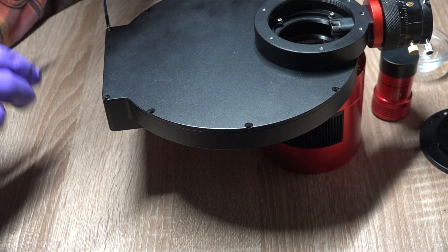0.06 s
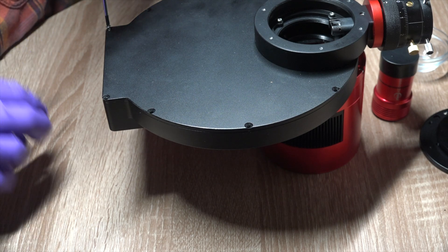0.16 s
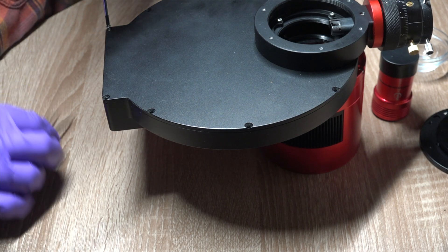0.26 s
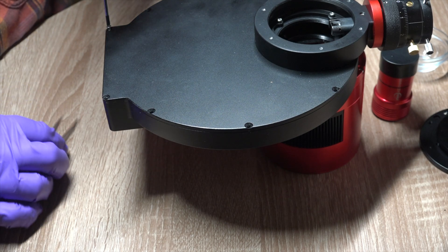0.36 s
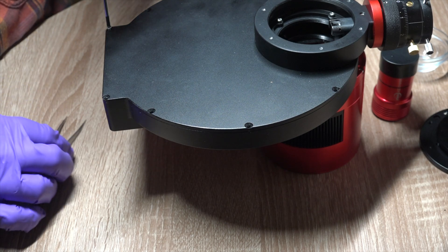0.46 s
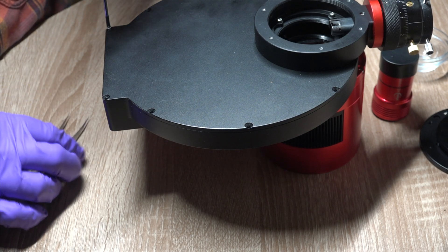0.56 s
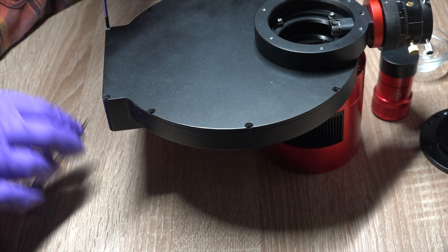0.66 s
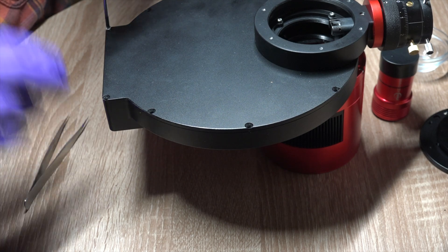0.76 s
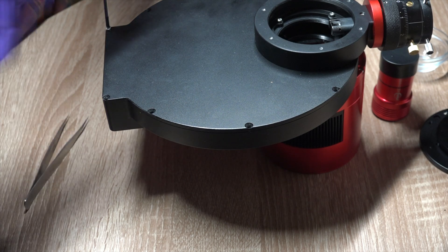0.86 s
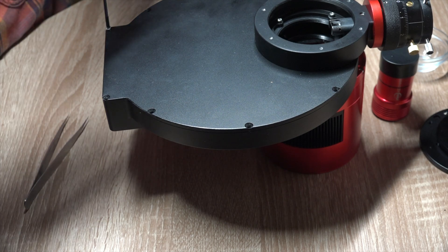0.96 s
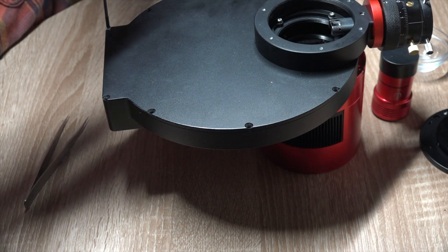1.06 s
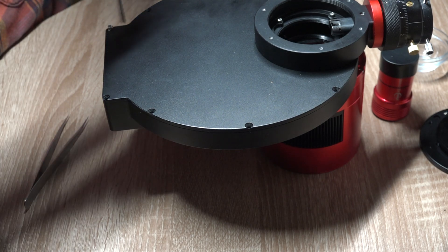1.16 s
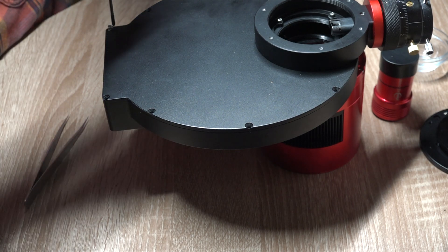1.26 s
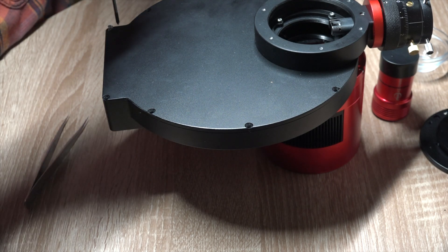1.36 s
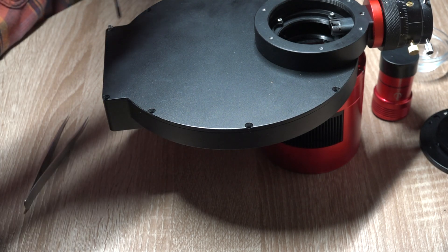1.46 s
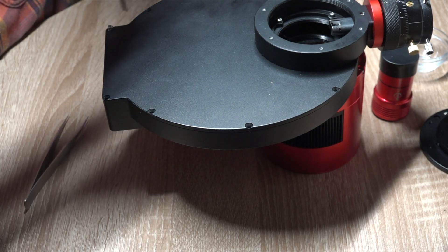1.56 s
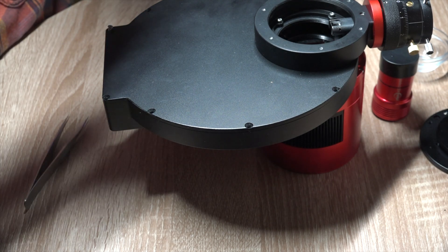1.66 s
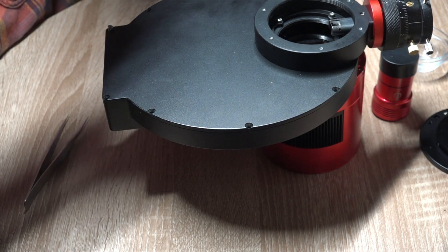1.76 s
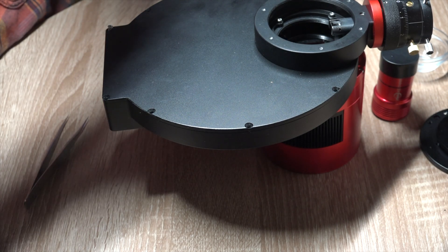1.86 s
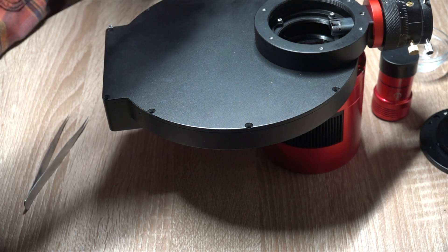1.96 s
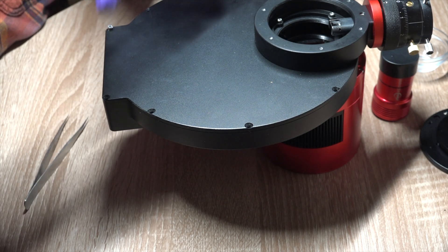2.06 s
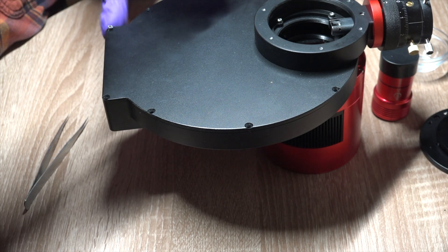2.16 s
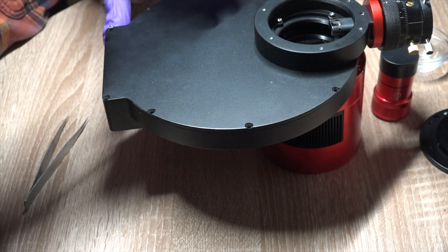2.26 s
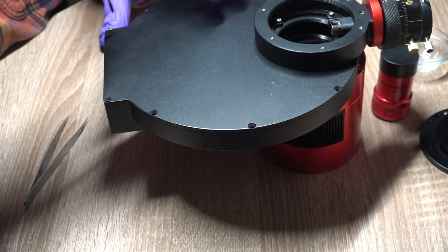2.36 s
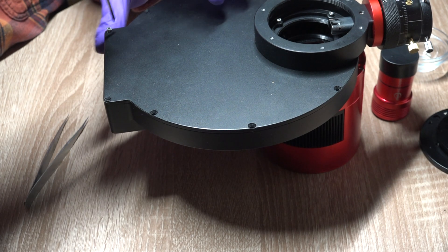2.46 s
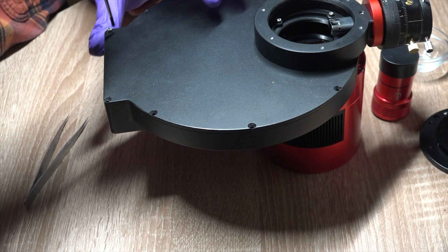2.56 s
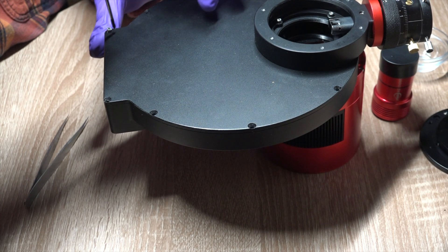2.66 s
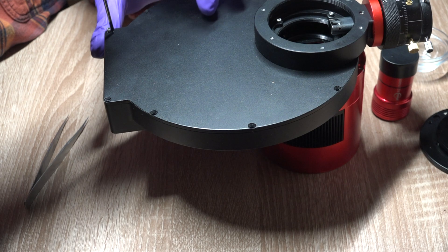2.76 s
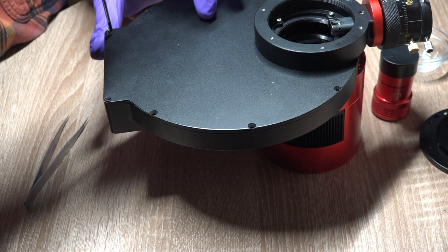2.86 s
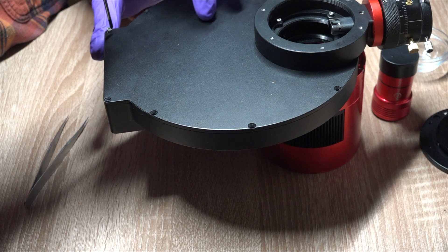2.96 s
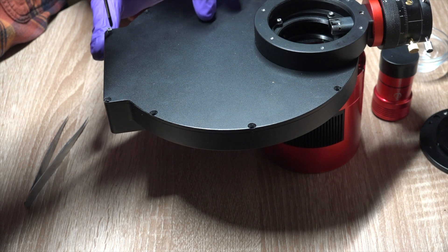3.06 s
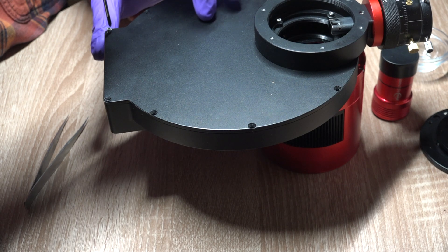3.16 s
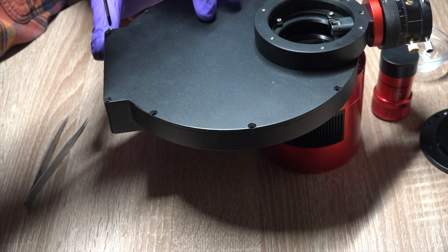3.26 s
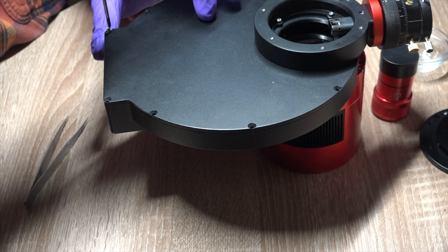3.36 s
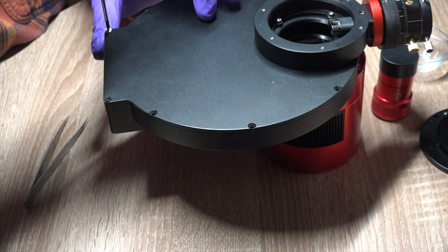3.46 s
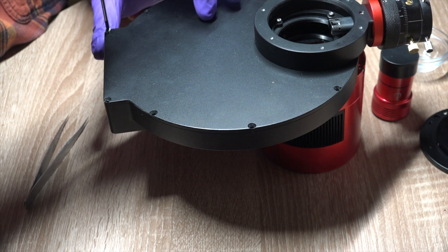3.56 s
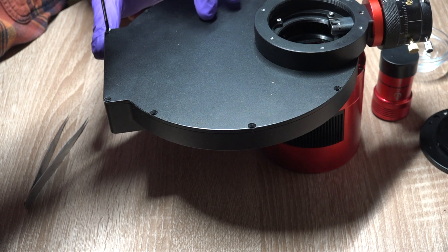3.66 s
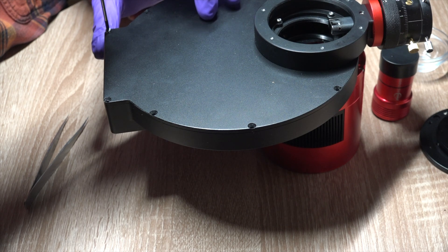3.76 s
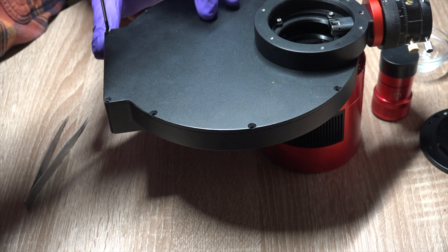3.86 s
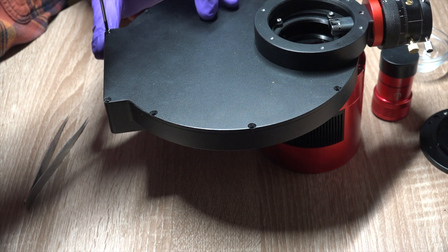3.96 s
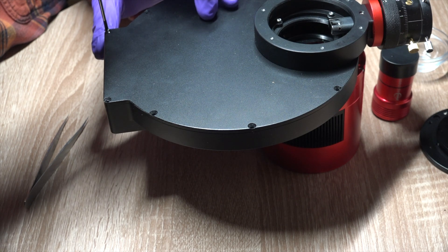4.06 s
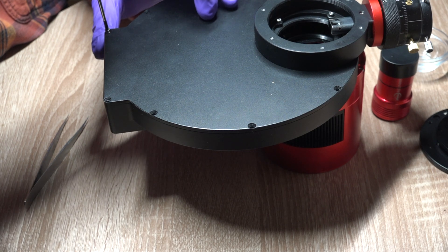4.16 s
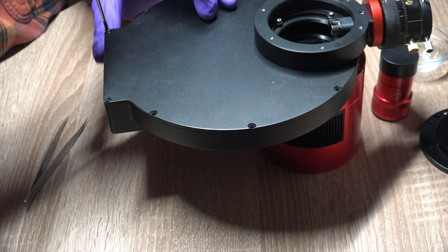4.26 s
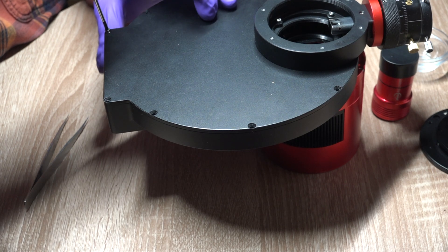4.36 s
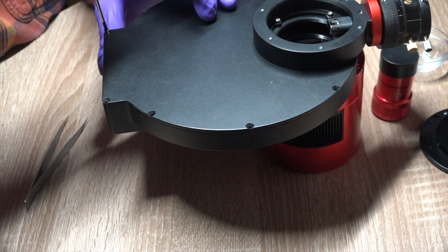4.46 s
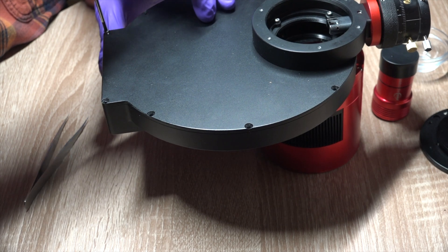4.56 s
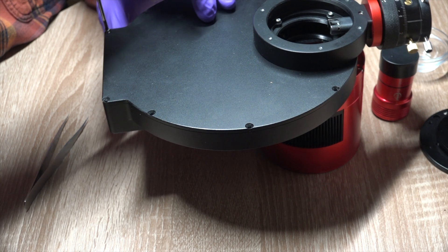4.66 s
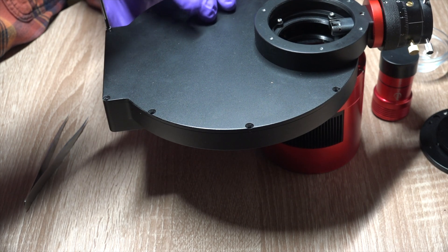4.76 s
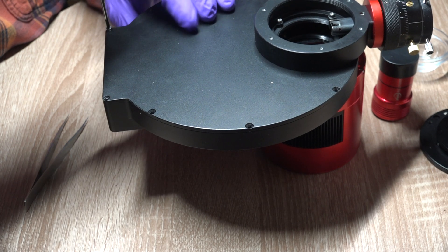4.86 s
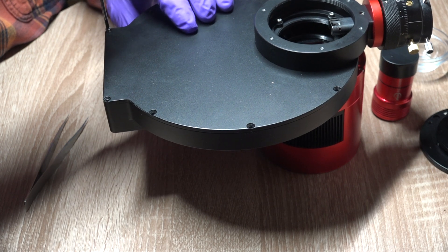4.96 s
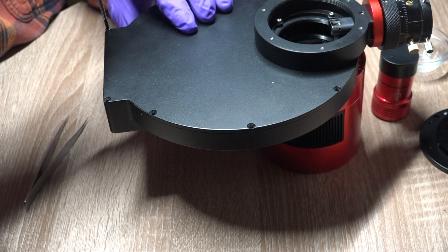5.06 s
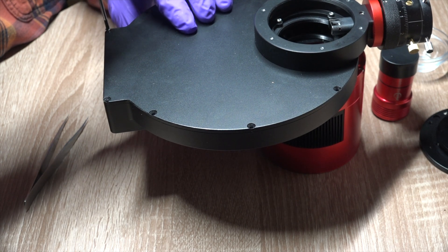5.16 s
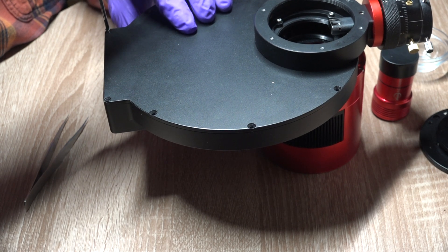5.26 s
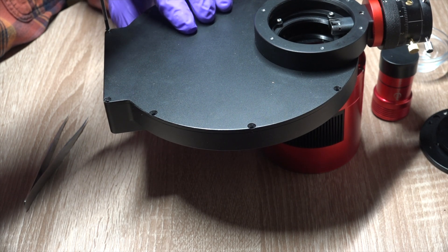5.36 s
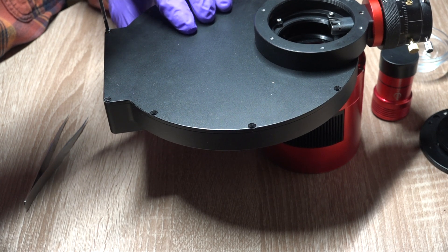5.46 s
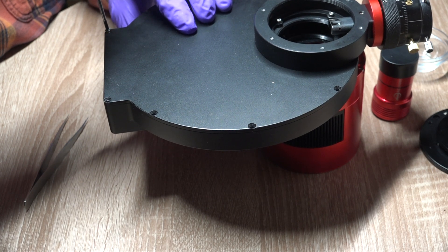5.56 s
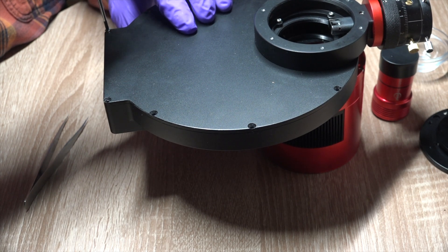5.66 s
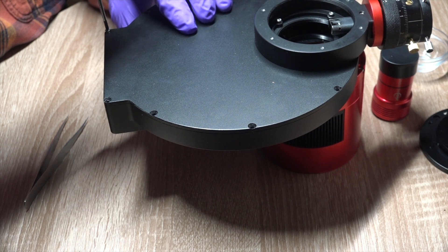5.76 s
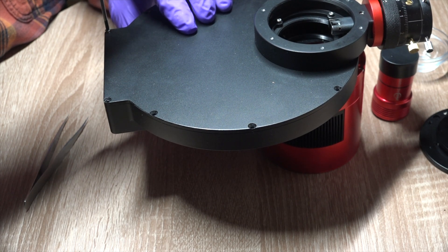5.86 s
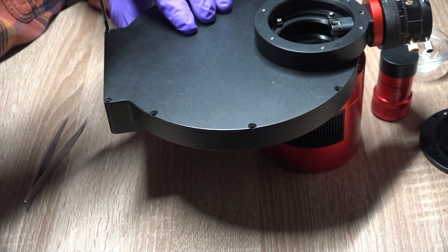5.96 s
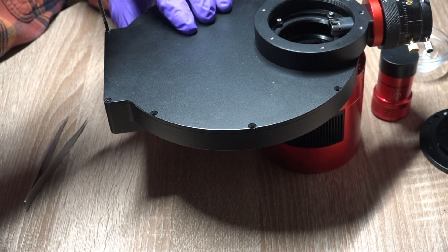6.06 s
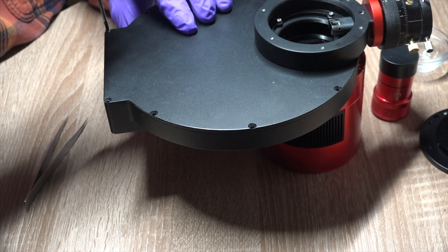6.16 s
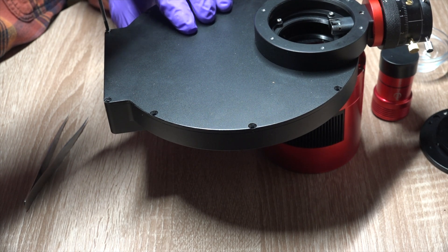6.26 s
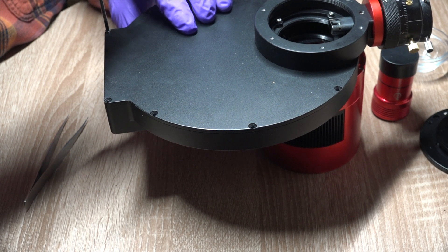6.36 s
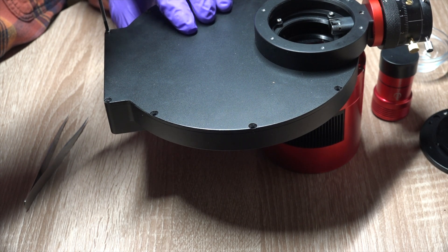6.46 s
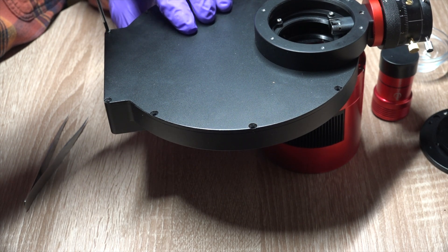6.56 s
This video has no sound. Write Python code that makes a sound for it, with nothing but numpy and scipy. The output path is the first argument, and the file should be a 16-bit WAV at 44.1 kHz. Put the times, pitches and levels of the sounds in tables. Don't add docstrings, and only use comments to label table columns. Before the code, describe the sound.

A small quiet room, close microphone, with faint low mains hum, soft hiss and barely audible rapid camera lens ticking. Rubber gloves rustle lightly throughout. At 0.3 s tweezers touch wood softly; at 0.44 they slap down with a bright steel ring, then scrape grittily along the grain from 0.52 to 0.7, bumping and fading. Around 1.07-1.14 a tick and clinks as a hex key is lifted, then sharp metallic strikes at 1.24-1.31. Sparse tiny ticks follow, clearest near 2.15, and a clear mid-pitched knock on a metal housing at 2.77. A near-quiet stretch holds faint dull fumbling at 3.5 and 4.1, with a small tick at 4.4. A low thump lands at 4.74, a burst of tight screw creaks at 4.96, thumps at 5.28 and 5.76, a short creak at 5.57, then faint squeaks and a loud snapping creak at 6.47, dying away by 6.6.

```python
import sys
import numpy as np
from scipy import signal
from scipy.fft import rfft, irfft, next_fast_len
from scipy.io import wavfile
from scipy.ndimage import uniform_filter1d

SR = 44100
rng = np.random.default_rng(int(sys.argv[2]) if len(sys.argv) > 2 else 0)


def to_wav(sig):
    pcm = np.clip(np.atleast_2d(sig), -1, 1) * 32767
    pcm = np.round(pcm).astype(np.int16)
    wavfile.write(sys.argv[1], SR, pcm.T)


def to_linear_factor(level_db):
    exponent = np.asarray(level_db, float) / 20
    return 10 ** exponent


N = 291942
T = np.arange(N) / SR

# f/Hz, width/Hz, level/dB
KEY_SEATED = [(662, 80, -10), (1050, 26, -8), (1270, 55, -7), (1710, 44, -6), (1950, 32, -11),
              (2610, 42, -1), (3100, 30, -7), (3500, 80, -12), (3800, 33, -8), (4010, 40, -9),
              (4670, 40, -10), (6210, 30, -11), (7300, 50, -12), (7850, 40, -14)]
SOCKET = [(180, 75, -9), (420, 40, -7), (581, 50, -1), (1270, 110, -7), (1730, 110, -4), (2620, 90, -7),
          (3150, 60, -9), (4000, 90, -10), (4600, 90, -9), (7300, 150, -20)]
# f/Hz, level/dB per Hz
METAL_CLICK = [(300, -29), (600, -10.5), (2600, -11.5), (3800, -6.5), (6800, -10.5), (8300, -7.5),
               (10500, -22), (15500, -28)]
WOOD = [(120, -37), (300, -14.5), (600, -6), (2000, 2.5), (3200, 0), (5200, -8.5), (7000, -30), (8500, -31),
        (11000, -40), (15500, -42)]


def level(x, db):
    return x * to_linear_factor(db) / np.sqrt(np.mean(x ** 2))


def curve(table, column):
    rows = np.array(table)
    return to_linear_factor(np.interp(T, rows[:, 0], rows[:, column], left=-200, right=-200))


def colour(x, points):
    hz, db = np.transpose(points)
    bins = np.fft.rfftfreq(4096, 1 / SR)
    cep = irfft(np.log(to_linear_factor(np.interp(np.log(bins + 1), np.log(hz), db))))
    cep[1:2048] *= 2
    cep[2049:] = 0
    impulse = irfft(np.exp(rfft(cep)))
    return signal.fftconvolve(x, impulse)[:len(x)]


def band(x, hz, width):
    return signal.lfilter(*signal.iirpeak(hz, hz / width, SR), x)


def walk(rate):
    k = int(SR / rate)
    held = np.repeat(rng.standard_normal(N // k + 1), k)
    return 1.3 * uniform_filter1d(uniform_filter1d(held, k), k)[:N]


def grit(count, rate_hz, spread_db):
    hit = rng.random(count) < rate_hz / SR
    sign = rng.standard_normal(count)
    size = rng.exponential(size=count)
    return hit * sign * to_linear_factor(spread_db * size)


def swell(s, db, rise_s, fade_s):
    out = np.zeros(N)
    near = slice(int(max(s - .2, 0) * SR), int((s + .7) * SR))
    t = T[near] - s
    out[near] = to_linear_factor(db) * np.exp(np.where(t < 0, -(t / rise_s) ** 2, -t / fade_s))
    return out


def knock(events, modes, crack, crack_db, tail_ms, rate_hz, low_hz, high_hz, soft, tilt_db):
    out, t = np.zeros(N + SR), T[:SR // 6]
    hz, width, db = np.repeat(np.array(modes, float), 3, axis=0).T
    spread = 0.7 * (np.arange(len(hz)) % 3 - 1)
    hz = hz + width * (spread + 0.12 * rng.standard_normal(len(hz)))
    onset = (1 - np.exp(-1600 * t))[:, None]
    rings = np.sin(2 * np.pi * np.outer(t, hz)) * np.exp(-4 * np.outer(t, width)) * onset
    for s, peak_db, chatter_ms, best_hz, *purer in events:
        rise_ms, fall_db = soft * chatter_ms, (purer or [tilt_db])[0]
        rise = (1 - np.exp(-1500 * t / max(rise_ms, .05))) ** 2
        push = rise * np.exp(-1000 * t / max(chatter_ms, .1))
        push = push * (grit(len(t), rate_hz, spread_db=2.0) + 0.18 * rng.standard_normal(len(t)))
        tail = rise * np.exp(-1000 * t / tail_ms) * rng.standard_normal(len(t))
        rattle = push / abs(push).max() + 0.11 * tail
        spectrum = np.sqrt(uniform_filter1d(abs(rfft(push)) ** 2, size=15))
        share = spectrum[(hz * len(t) / SR).astype(int)]
        gain = to_linear_factor(db - fall_db * abs(np.log2(hz / best_hz))) * np.sqrt(width)
        gain = gain * np.sign(rng.standard_normal(len(hz)))
        body = signal.fftconvolve(push, rings @ (gain / share))[:len(t)]
        dry_crack = colour(rattle, [(f, d - fall_db * abs(np.log2(f / best_hz))) for f, d in crack])
        sound = body / abs(body).max() + to_linear_factor(crack_db + tilt_db - fall_db) * dry_crack / abs(dry_crack).max()
        start = int(s * SR)
        out[start:start + len(t)] += to_linear_factor(peak_db) * sound
    return signal.sosfilt(signal.butter(3, [low_hz, high_hz], "band", fs=SR, output="sos"), out[:N])


def tweezers():
    # t/s, level/dB, chatter/ms, strongest f/Hz
    touches = [
        (0.3145, -31.5, 4, 600),
        (0.329, -38, 6, 400),
    ]
    hits = [
        (0.4375, -9.5, 3.4, 2800),
        (0.45, -25, 3.1, 3100),
        (0.480, -27, 2.6, 3100),
    ]
    # f/Hz, width/Hz, level/dB
    heel = [(378, 30, -4), (560, 60, -12), (850, 60, -10), (1600, 130, -17), (2600, 70, -18),
            (3400, 40, -17), (4450, 70, -14), (8100, 60, -22)]
    arms = [(350, 40, -13), (598, 32, -9), (1060, 38, 0), (1350, 40, -7), (1650, 40, -4), (1780, 50, -5),
            (2670, 48, -7), (3160, 60, 0), (3900, 80, -6), (4690, 40, -10), (5530, 45, -15),
            (7150, 24, -11), (8500, 300, -14), (11600, 90, -18)]
    soft_touch = knock(touches, heel, METAL_CLICK, -7.5, 30, 3000, 200, 11000, .17, 1.5)
    return soft_touch + knock(hits, arms, METAL_CLICK, -5.5, 24, 3000, 260, 15500, .4, .4)


def slide():
    # t/s, level/dB
    scrape = [
        (0.515, -42),
        (0.541, -21),
        (0.6, -20.5),
        (0.66, -26),
        (0.74, -46),
        (0.8, -65),
    ]
    # t/s, level/dB
    grain_bumps = [(0.52, -20), (0.531, -3), (0.538, 5), (0.544, -4), (0.549, 2), (0.563, -4), (0.575, -2),
                   (0.582, -7), (0.592, 2), (0.597, -3), (0.604, 0), (0.616, -8), (0.629, -6), (0.642, -9),
                   (0.655, -9), (0.676, -15), (0.695, -18), (0.718, -22)]
    # f/Hz, width/Hz, level/dB
    tip_modes = [(7250, 60, -38), (8100, 90, -35), (11000, 120, -47), (13300, 150, -43)]
    catch = curve(scrape, 1) * to_linear_factor(2.8 * walk(120)) * level(grit(N, 1800, spread_db=2.2), -5)
    unit = np.std(colour(rng.standard_normal(SR), WOOD))
    tips = sum(to_linear_factor(db) * band(catch, hz, w) * np.sqrt(SR / w) for hz, w, db in tip_modes)
    bump_hz, sag_hz_per_s, chatter_ms = 3400, 7000, .6
    bumps = [(s, db, chatter_ms, bump_hz - sag_hz_per_s * (s - scrape[0][0])) for s, db in grain_bumps]
    bumping = knock(bumps, SOCKET, WOOD, 9, 9, 9000, 330, 9000, .13, 2.6)
    return colour(catch, WOOD) / unit + tips + to_linear_factor(-16.5) * bumping


def hex_key():
    # t/s, level/dB, chatter/ms, strongest f/Hz, (fall/dB per octave)
    lift = [
        (1.109, -27, 13, 571),
        (1.125, -19, 5.5, 1500, 3),
        (1.139, -22, 4.8, 1060),
    ]
    hits = [
        (1.241, -14, 4.5, 2400),
        (1.258, -18, 2.5, 4000),
        (1.264, -15, 7, 2700, 3),
        (1.310, -24.5, 5.3, 3100),
    ]
    feeling = [(3.455, -45.5, 15, 2690), (3.476, -35.5, 7, 2640), (3.498, -36.5, 11, 1710),
               (3.549, -34, 5.7, 1100), (3.563, -38, 6, 1000), (4.021, -45, 4, 3100, 12),
               (4.084, -48, 4, 3100, 8), (4.11, -44, 14, 2620, 5), (4.124, -40, 7, 1270),
               (4.137, -35, 6, 900), (4.147, -37, 6, 550, 5), (4.272, -49, 4, 1800, 6)]
    # f/Hz, width/Hz, level/dB
    loose = [(571, 30, -3), (1070, 45, -2), (1360, 33, -10), (1640, 70, -3), (1960, 50, -9),
             (2610, 70, -12), (3090, 32, -10), (4050, 70, -9), (4840, 50, -9), (5520, 32, -7),
             (6120, 50, -9), (7250, 40, -7), (7900, 43, -13), (11700, 200, -10)]
    steel = knock(lift, loose, METAL_CLICK, -2.5, 33, 5000, 136, 15000, .45, 1.6)
    steel += knock(hits, KEY_SEATED, METAL_CLICK, -4.5, 30, 4000, 198, 7500, .27, 1.9)
    return steel + knock(feeling, SOCKET, METAL_CLICK, -2, 25, 6000, 117, 12000, .25, 2.1)


def housing():
    # t/s, level/dB, chatter/ms, strongest f/Hz
    hits = [
        (2.719, -43, 3.3, 347),
        (2.765, -18, 6.5, 1000),
    ]
    # f/Hz, width/Hz, level/dB
    walls = [(409, 30, -6), (600, 70, -4), (1070, 25, -9), (1280, 55, 1), (1650, 36, -9), (1860, 42, -1),
             (2320, 67, -13), (2680, 44, -7), (3040, 30, -13), (3460, 56, -3), (4060, 40, -12),
             (4680, 40, -8), (5490, 80, -16), (7600, 200, -24)]
    return knock(hits, walls, METAL_CLICK, -4, 24, 4000, 240, 11000, .3, .6)


def screws():
    # t/s, level/dB, chatter/ms, strongest f/Hz, (fall/dB per octave)
    first_creaks = [(4.699, -45, 6, 1850), (4.911, -44, 2, 3000), (4.944, -37, 7, 2060, 12),
                    (4.961, -12.5, 5.5, 3000), (4.972, -14, 6, 1840, 5), (4.983, -16, 5.8, 2400),
                    (5.009, -28, 8, 1780), (5.211, -47.5, 4.3, 2150)]
    squeaks = [(5.338, -33, 6, 3500, 30), (5.472, -41, 13, 4500), (5.528, -39, 10, 1900, 13),
               (5.567, -17, 6, 2700, .5), (5.706, -39, 5, 2570), (5.96, -45, 20, 3500, 15),
               (6.056, -42, 14, 4700, 9), (6.078, -35, 13, 2450, 12), (6.404, -36, 9, 4100, 8),
               (6.43, -44, 8, 2050, 15), (6.448, -38, 8, 2050, 20)]
    last_creak = [
        (6.458, -27, 11, 1856, 30),
        (6.4697, -12, 6.9, 3540),
        (6.478, -7.5, 5.4, 2980),
        (6.502, -24, 6.08, 2940),
        (6.538, -30, 6, 2970, 8),
    ]
    # f/Hz, width/Hz, level/dB
    thread = [(1250, 90, -15), (1640, 45, -7), (1748, 55, -2), (1831, 60, -1), (2062, 50, -11),
              (2950, 100, -11), (3440, 55, -2), (3570, 55, 0), (3720, 50, -8), (4300, 130, -15),
              (5000, 120, -15), (5550, 40, -10), (5800, 36, -10), (7400, 150, -19)]
    tight = [(1150, 60, -12), (1850, 70, -3), (2050, 60, -6), (2450, 80, -11), (3050, 80, -11),
             (3500, 55, 1), (4720, 55, -14), (5600, 55, -6), (7560, 72, -22)]
    loose = [(1180, 80, -9), (1390, 50, -4), (1550, 40, -6), (1735, 35, -2), (1856, 35, -9), (2787, 40, -6),
             (2976, 40, 0), (3168, 45, -3), (3420, 70, -8), (4400, 55, -10), (4640, 70, -9),
             (5090, 55, -14), (5950, 100, -16), (7900, 120, -21)]
    # t/s, level/dB
    turning = [(4.8, -76), (4.95, -58), (5.388, -73), (5.49, -56), (5.62, -60), (5.8, -66), (5.97, -54),
               (6.1, -56), (6.2, -72), (6.462, -52), (6.62, -62)]
    creaks = knock(first_creaks, thread, METAL_CLICK, -14, 30, 6000, 1500, 15000, .48, 1.9)
    creaks += knock(squeaks, tight, WOOD, -15, 24, 6000, 930, 9800, .55, 1.8)
    creaks += knock(last_creak, loose, METAL_CLICK, -14, 28, 6000, 1250, 15000, .38, 3.1)
    slip = grit(N, 2500, spread_db=0.9) * to_linear_factor(3.6 * walk(25))
    murmur = 0
    for hz, width, db in [(2050, 470, -7), (3500, 260, -8), (4800, 300, -9)]:
        murmur = murmur + level(band(band(slip, hz, width), hz, 2 * width), db)
    return creaks + curve(turning, 1) * murmur


def table_top():
    # t/s, level/dB, chatter/ms, strongest f/Hz, (fall/dB per octave)
    thumps = [(0.914, -39, 7.9, 265, 8), (2.371, -44.5, 5, 202), (4.735, -28, 6, 600),
              (4.74, -20.5, 6, 170), (5.279, -25, 5, 150), (5.292, -32, 3.8, 339), (5.756, -23.5, 7.1, 159),
              (5.769, -25.5, 8.3, 105), (5.83, -48, 5, 118), (6.191, -46, 8.2, 167), (6.250, -35, 12, 178),
              (6.546, -42, 6, 140, 4)]
    answers = [
        (0.439, -42, 6, 350, 10),
        (0.54, -39, 12, 330, 12),
        (0.6, -38, 14, 300, 12),
        (0.655, -42, 14, 260, 12),
        (1.13, -44, 10, 200, 12),
        (1.25, -38, 12, 355, 14),
        (1.27, -46, 10, 200, 12),
        (2.768, -43, 6, 190, 10),
        (4.145, -48, 8, 280, 8),
        (6.475, -41, 10, 900, 8),
    ]
    # f/Hz, width/Hz, level/dB
    boards = [(124, 36, 3), (191, 50, -2), (263, 45, -3), (353, 42, -4), (450, 45, -4), (700, 60, -1),
              (1040, 70, -8), (1410, 50, -13)]
    # f/Hz, level/dB per Hz
    knuckle = [(120, -8), (300, -1), (700, 0), (1100, -6), (1600, -14), (2600, -26), (15500, -50)]
    return knock(thumps + answers, boards, knuckle, -5, 40, 1500, 95, 2400, .38, 1.3)


def stray_ticks():
    # t/s, level/dB, chatter/ms, strongest f/Hz, (fall/dB per octave)
    ticks = [(0.9193, -36.5, 2.8, 4060), (1.0574, -43, 1.3, 4560), (1.0682, -15, 1.5, 8970, 16),
             (1.6054, -49, 1.5, 5110), (1.8107, -36, 1.8, 1820), (1.954, -33, 3, 4550),
             (1.995, -39, 1.8, 5130), (2.13, -38.5, 1.4, 1850), (2.1526, -21, 2, 4810),
             (2.162, -22, 4, 3740), (3.0584, -45, 1, 1200, 5), (4.4046, -26, 1.5, 2110, 8.6),
             (4.4258, -41, 2, 3210), (4.5074, -43, 1.4, 8260), (4.746, -22, 3, 1850, 9)]
    return to_linear_factor(-22.5) * knock(ticks, KEY_SEATED, METAL_CLICK, 22.05, 20.7, 8200, 640, 15500, .16, 2.8)


def hands():
    # t/s, rustle level/dB
    busy = [(0.0, -63), (0.4, -61.5), (2.1, -61), (2.8, -66.5), (3.6, -68.5), (4.1, -61), (4.7, -62.5),
            (5.1, -59), (6.62, -58.5)]
    # t/s, level/dB, fade/s, airy top against it/dB
    swishes = [(1.08, -52, .09, -11), (1.63, -57, .08, -9), (1.86, -60, .08, -14), (1.98, -55, .07, -10),
               (4.44, -61, .08, -8), (5.21, -62, .035, -4), (5.71, -58, .035, -6), (6.21, -60, .04, -6),
               (6.42, -62, .05, -6)]
    # t/s, level/dB
    drags = [(0.4, -54), (1.1, -58), (1.56, -56), (1.7, -62), (1.86, -61), (2.0, -59), (2.32, -59),
             (3.62, -60), (4.1, -59), (5.22, -53), (5.63, -55), (6.21, -54), (6.6, -54)]
    # f/Hz, level/dB per Hz
    glove = [(800, -24.5), (1500, -8), (2500, -5.5), (4500, -3), (6000, -4.5), (8000, -5), (10000, -10.5),
             (15500, -28.5)]
    rise_s, drag_s = .025, .05
    rub = to_linear_factor(1.48 * walk(20)) * grit(N, 9000, spread_db=1.0)
    body = curve(busy, 1)
    airy = to_linear_factor(-14) * body
    for s, db, fade_s, top_db in swishes:
        body = body + swell(s, db, rise_s, fade_s)
        airy = airy + swell(s, db + top_db, rise_s, fade_s)
    rustle = body * level(colour(rub, glove), -1) + airy * level(band(rub, 12500, 6000), 2.5)
    drag = to_linear_factor(-65) + sum(swell(s, db, drag_s, drag_s) for s, db in drags)
    cloth = level(band(rng.standard_normal(N), 250, 270), -5.5)
    return rustle + drag * to_linear_factor(1.6 * walk(7.4)) * cloth


def room(x):
    # f/Hz, t60/s, level/dB
    decays = [(161, 0.4, -24.5), (490, 0.4, -20.5), (1390, 0.35, -13), (4000, .4, -13.5),
              (9000, 0.313, -22.5)]
    t = T[:SR // 2]
    tail = 0
    for hz, t60, db in decays:
        noise = band(rng.standard_normal(len(t)), hz, 1.17 * hz)
        tail = tail + level(noise * 1000 ** (-t / t60), db)
    return signal.fftconvolve(x, tail * (1 - np.exp(-t / 0.0027)) / np.sqrt(len(t)))[:N]


def lens_drive():
    # t/s, level/dB
    loudness = [(2.1, -58), (2.3, -60.5), (3.2, -64.5), (4.0, -62), (4.7, -64), (5.5, -76), (6.62, -74)]
    # f/Hz, width/Hz, level/dB
    barrel = [(530, 150, -7.5), (1100, 83, -4.5), (4820, 130, -15)]
    frame_hz, lead_s = 29.97, .0105
    steps = np.zeros(N)
    at = (np.arange(1, N / SR * frame_hz) / frame_hz - lead_s) * SR
    steps[at.astype(int)] = to_linear_factor(1.7 * rng.standard_normal(len(at)))
    return sum(to_linear_factor(db) * level(band(steps, hz, w), 0) for hz, w, db in barrel) * curve(loudness, 1)


def mains_hum():
    # f/Hz, rms level/dB
    partials = [(45, -79.5), (59.94, -80), (101, -79), (119.88, -68), (239.76, -79), (290, -83)]
    out = np.zeros(N)
    for hz, db in partials:
        tone = np.sin(2 * np.pi * hz * T + .3 * walk(4.1))
        out += level(tone, db) * to_linear_factor(2.2 * walk(3.2))
    return out


def air(points, db):
    return level(colour(rng.standard_normal(N), points), db)


def two_ports(mid):
    # f/Hz, side share/ratio
    lean_points = np.array([(60, -.05), (200, -.03), (380, 0.19), (700, 0.37), (1300, 0.2), (2400, 0.089),
                            (4400, 0.092), (7000, 0.)])
    # f/Hz, level/dB per Hz
    side_air = [(25, -19), (140, 7), (317, -2.5), (700, -5), (1190, -2), (3520, -37), (5430, -11.5),
                (12500, -11), (16000, -34)]
    gap_hz, gap_width_hz, gap_db = 8440, 1800, -4.5
    size = next_fast_len(N)
    hz = np.fft.rfftfreq(size, 1 / SR)
    lean = np.interp(np.log(hz + 1), np.log(lean_points[:, 0]), lean_points[:, 1])
    lag = 1j * to_linear_factor(gap_db) * np.exp(-((hz - gap_hz) / gap_width_hz) ** 2)
    side = irfft(rfft(mid, size) * (lean + lag), size)[:N] + air(side_air, -67)
    return np.array([mid + side, mid - side])


def scene():
    # f/Hz, level/dB per Hz
    shared_air = [(25, -18), (114, 5), (175, -10), (236, -33.5), (277, -14), (591, -12.5), (1070, -4.5),
                  (1440, -15.5), (4870, -26), (6740, -34.5), (7920, -18.5), (12500, -19), (16000, -33)]
    near = tweezers() + slide() + hex_key() + housing() + screws()
    near = near + table_top() + stray_ticks() + hands()
    mid = near + room(near) + lens_drive() + mains_hum() + air(shared_air, -63)
    return two_ports(mid)


def roll_off(x):
    return signal.sosfilt(signal.butter(12, 15850, fs=SR, output="sos"), x)


def record(dry):
    rounded = .8 * np.tanh(dry / .8)
    return roll_off(rounded)


dry = scene()
out = record(dry)
to_wav(out)
```